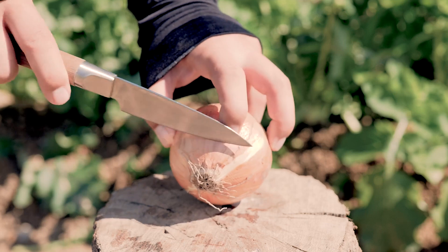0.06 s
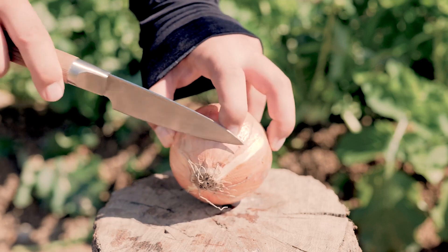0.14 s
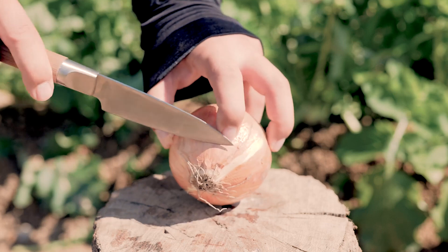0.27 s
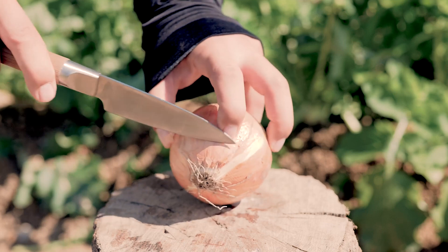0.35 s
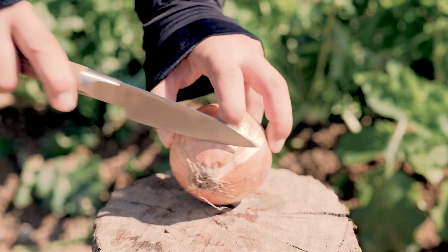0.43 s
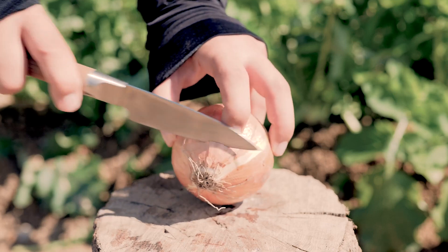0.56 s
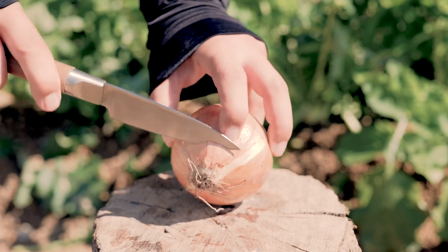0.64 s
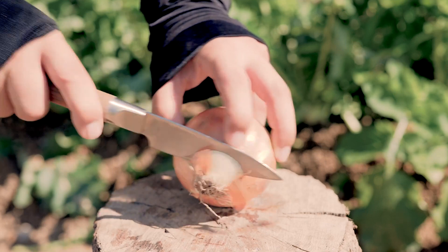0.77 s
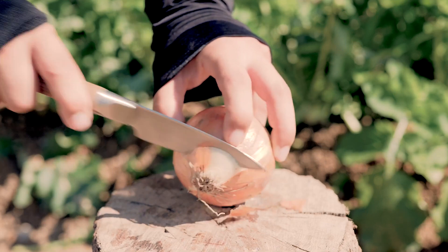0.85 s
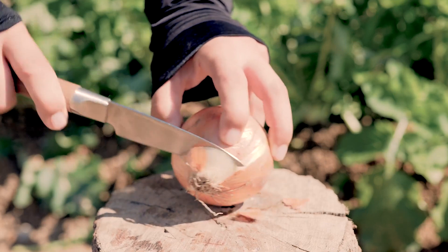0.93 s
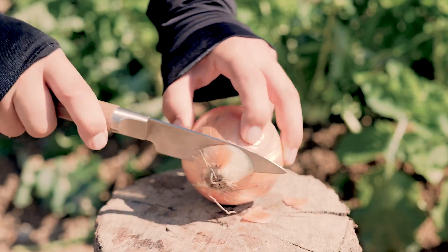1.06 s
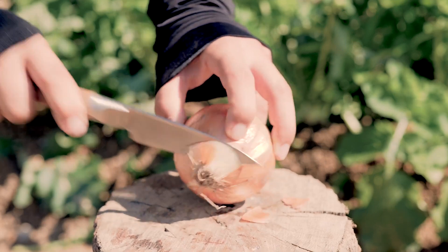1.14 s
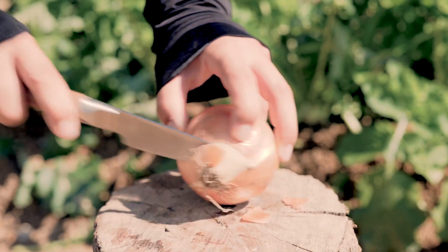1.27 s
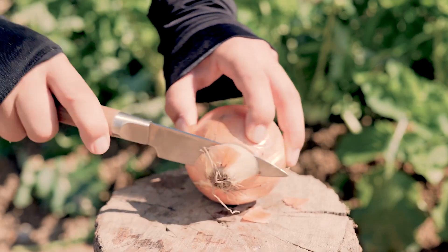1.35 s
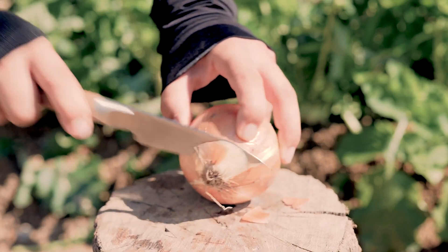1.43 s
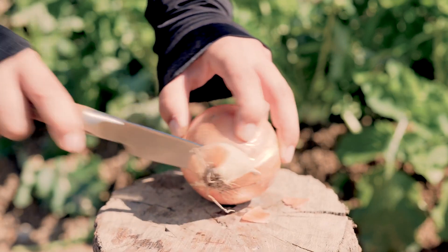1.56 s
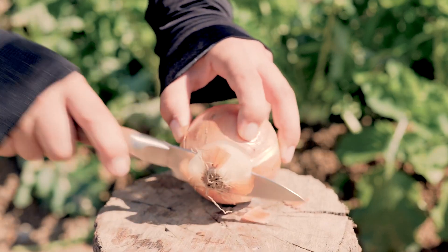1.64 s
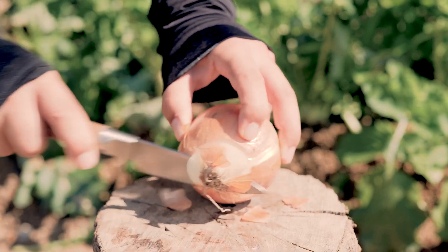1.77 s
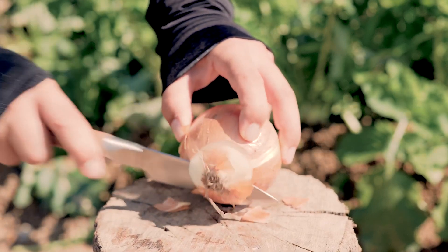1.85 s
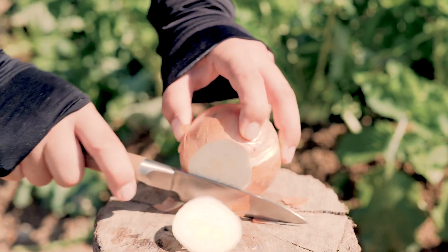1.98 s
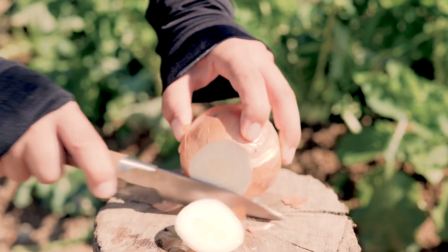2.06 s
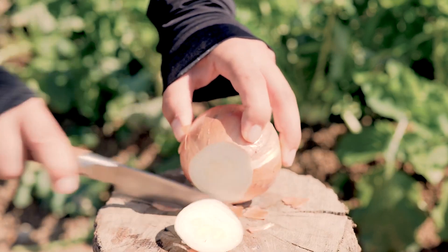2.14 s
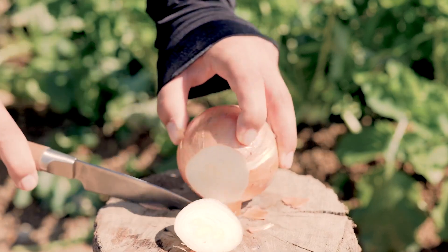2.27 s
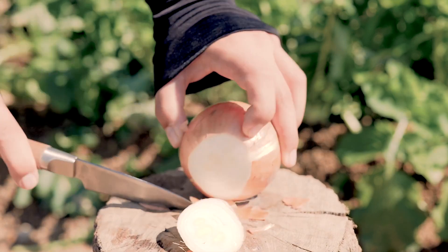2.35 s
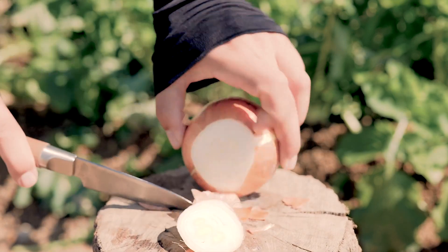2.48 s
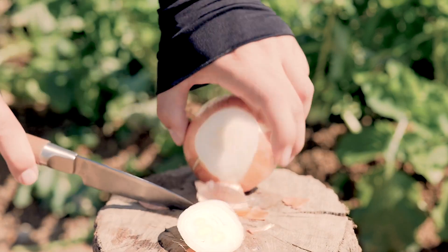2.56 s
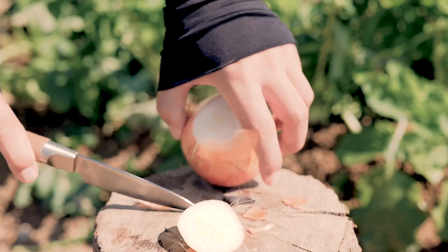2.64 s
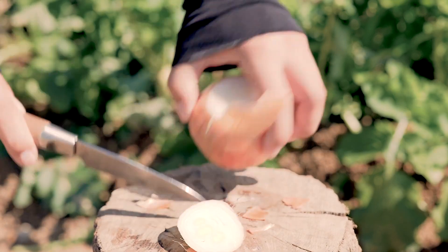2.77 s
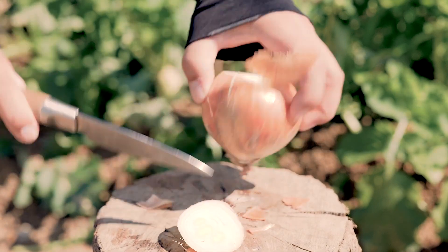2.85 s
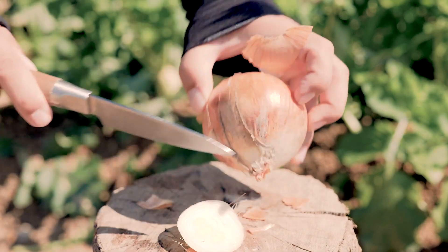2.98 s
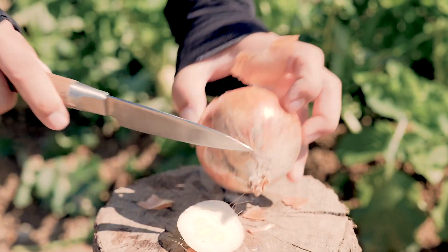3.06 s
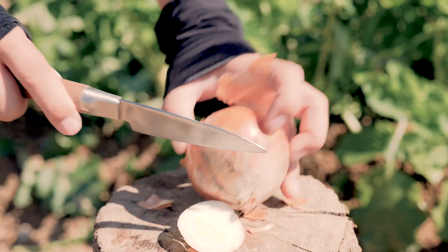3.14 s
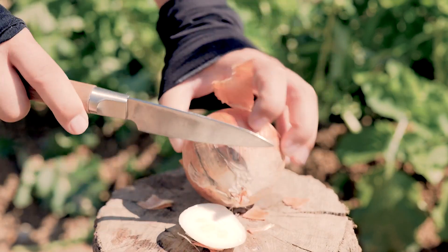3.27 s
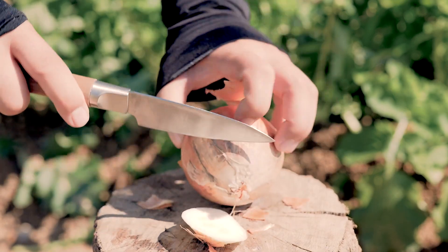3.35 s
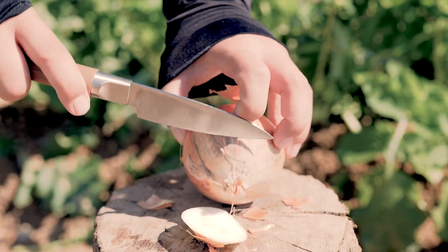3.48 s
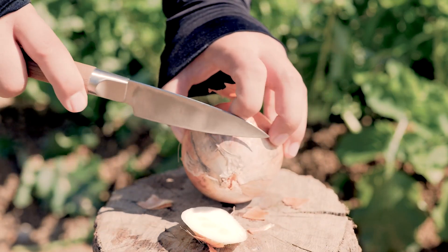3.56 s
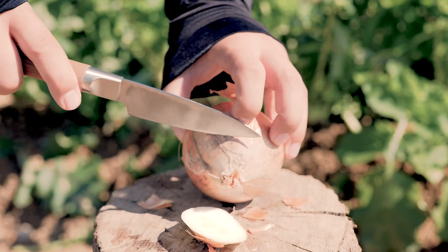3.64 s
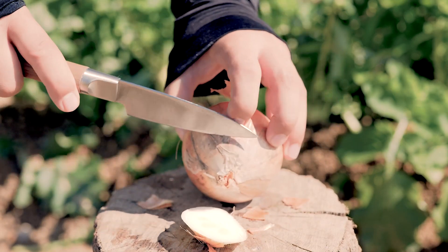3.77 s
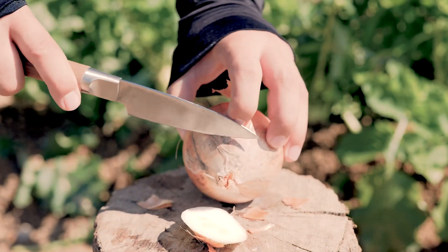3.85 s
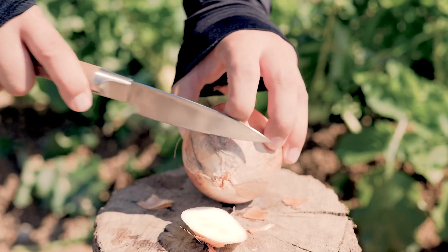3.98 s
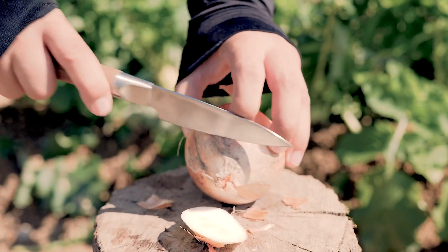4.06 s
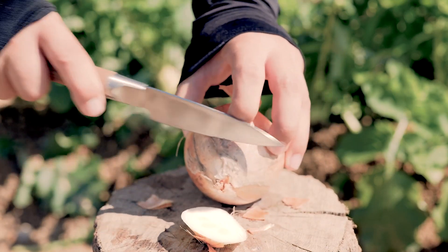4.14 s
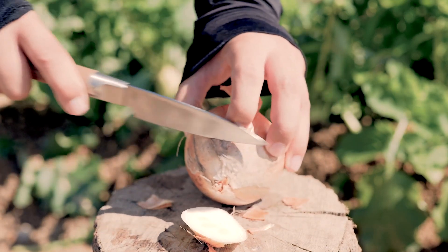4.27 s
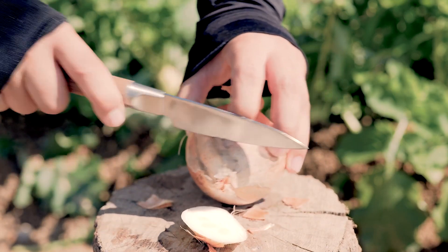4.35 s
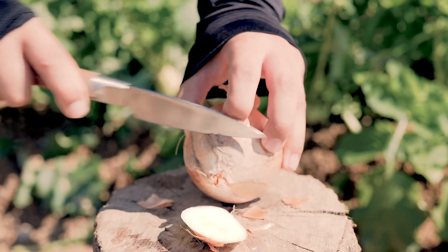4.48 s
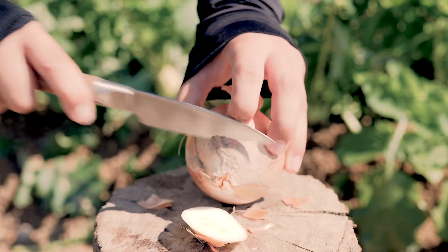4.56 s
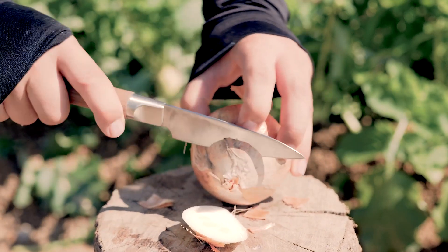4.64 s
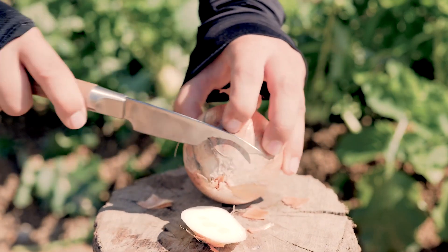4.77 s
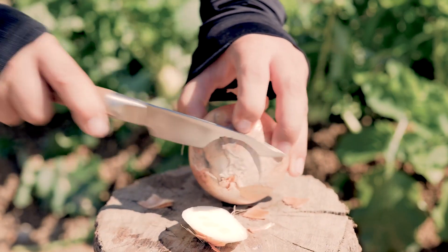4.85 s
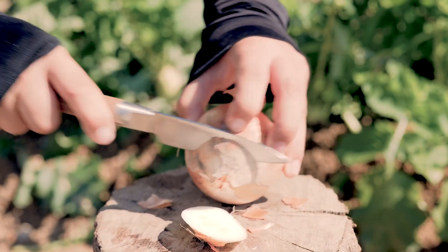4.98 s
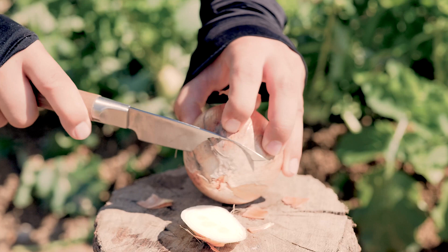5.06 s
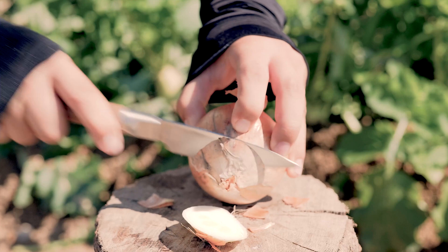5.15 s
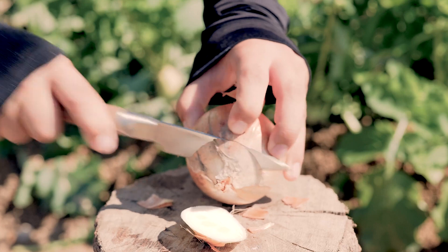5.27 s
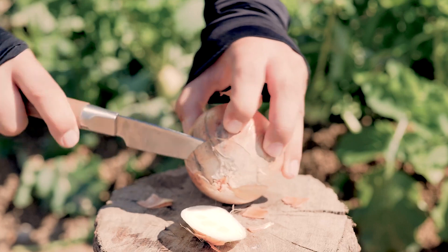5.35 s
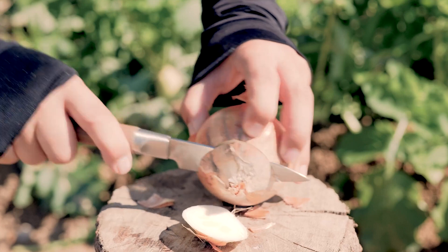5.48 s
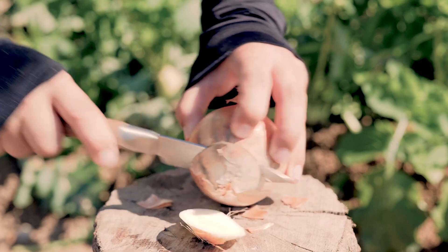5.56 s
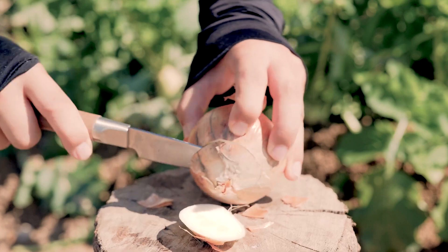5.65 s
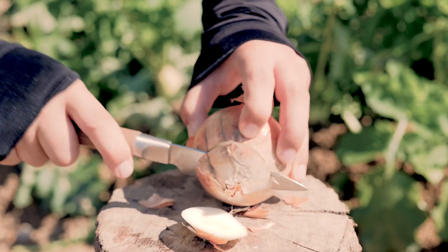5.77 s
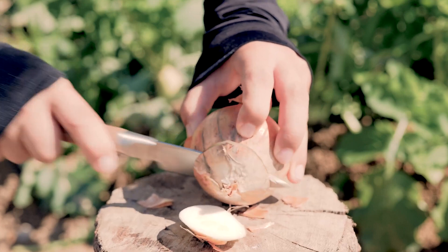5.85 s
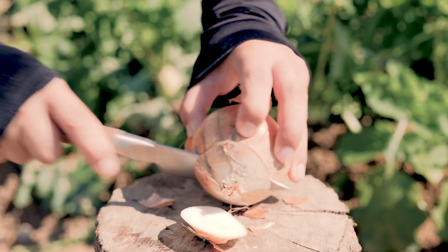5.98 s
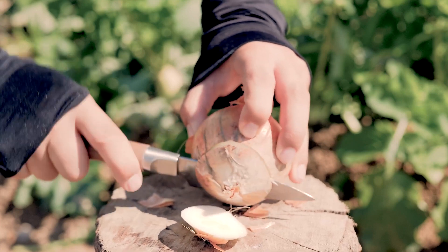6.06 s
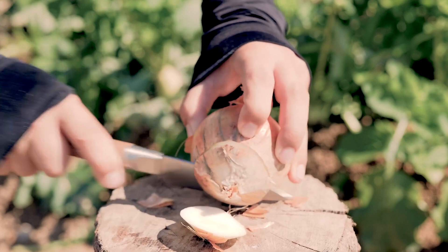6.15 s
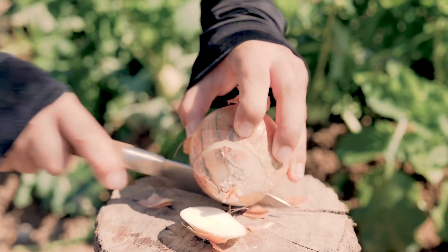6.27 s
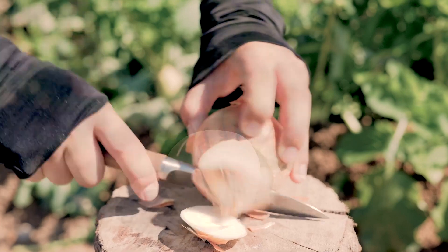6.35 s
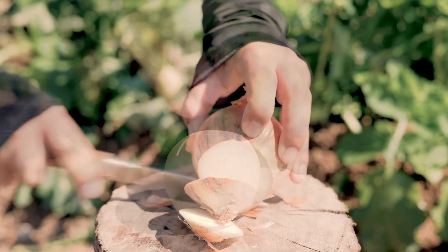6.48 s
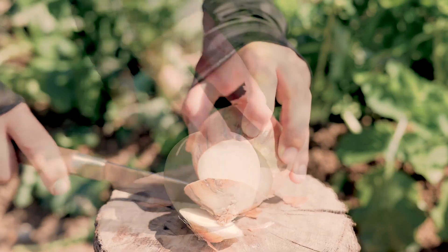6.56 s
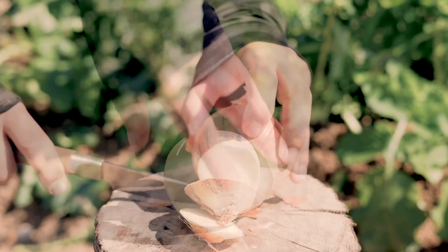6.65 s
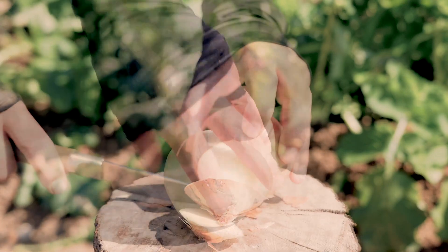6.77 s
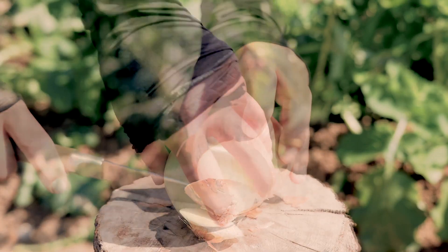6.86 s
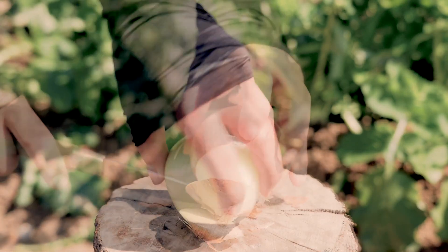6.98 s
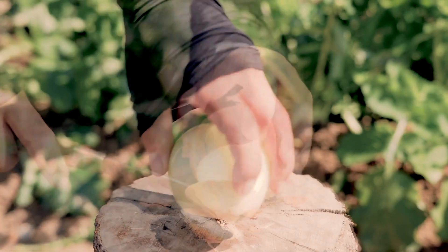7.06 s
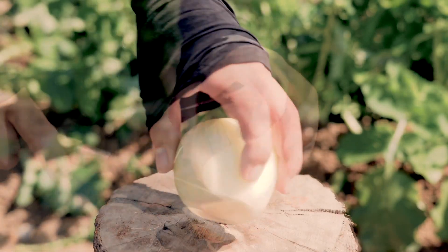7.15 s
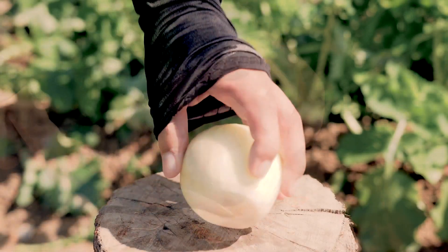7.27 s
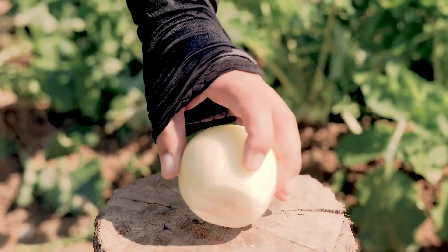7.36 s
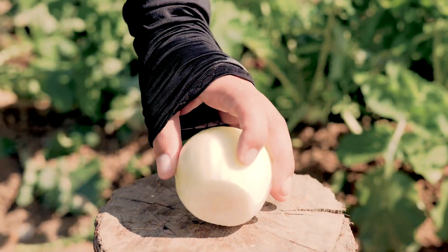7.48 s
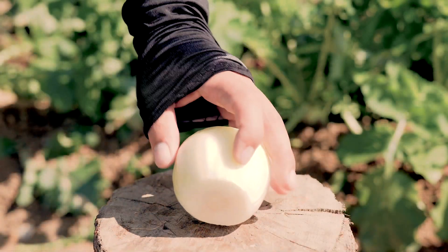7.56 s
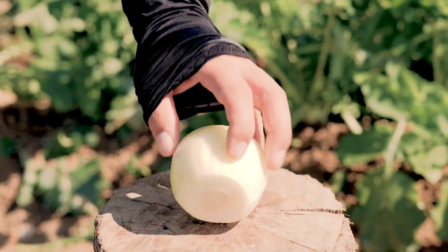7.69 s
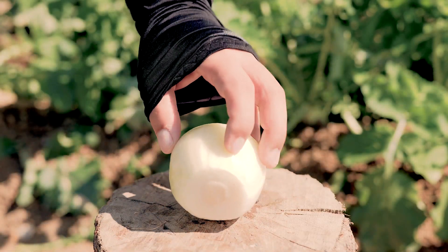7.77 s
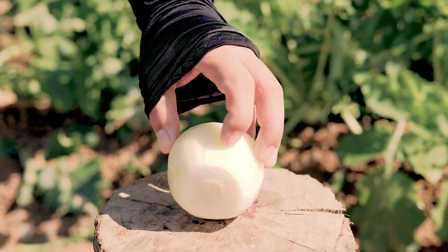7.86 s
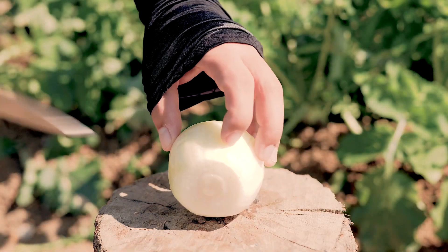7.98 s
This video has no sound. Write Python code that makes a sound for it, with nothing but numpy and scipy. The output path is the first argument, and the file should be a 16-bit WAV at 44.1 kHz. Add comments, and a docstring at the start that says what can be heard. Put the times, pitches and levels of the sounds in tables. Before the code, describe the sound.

A knife crunches through both ends of an onion on a stump, papery skin snapping and tearing, then quiet garden air with small birds.

```python
"""Garden, tree stump: a knife saws both ends off an onion, close to a nearly mono microphone.
Each stroke bursts a swarm of juicy cells and rubs the papery skin: coloured grains and noise under moving levels.
Dry skin and whole layers give way in single snaps: a ringing flake, a noise crack, a knock of the bulb modes.
Dull decaying sines bump the stump. Behind: shaped-noise air and a puff of wind, far engine lines,
gliding sines for small birds, and a late, wavering insect tone."""
import sys
import numpy as np
from scipy import signal
from scipy.fft import rfft, irfft, next_fast_len
from scipy.io import wavfile
from scipy.ndimage import uniform_filter1d

SR = 44100
rng = np.random.default_rng(int(sys.argv[2]) if len(sys.argv) > 2 else 0)


def wav_out(sig):
    """Save sig, one row per channel (or a flat mono array), as 16-bit PCM at SR to the path in sys.argv[1]."""
    wavfile.write(sys.argv[1], SR, np.round(np.clip(np.atleast_2d(sig).T, -1, 1) * 32767).astype(np.int16))


N = 353682

# Knife strokes, to and fro. Each row: peak in seconds, rise in seconds, fall in seconds, scrape in dB,
# bite from 0 (skates on the skin) to 1 (deep in the flesh).
STROKES = [(0.546, 0.055, 0.17, -52, 0.86), (0.611, 0.0024, 0.028, -41.5, 0.98),
           (0.729, 0.045, 0.051, -43, 0.093), (0.83, 0.03, 0.11, -38.5, 0.85),
           (1.027, 0.21, 0.051, -60, 0.83), (1.179, 0.11, 0.05, -47, 1), (1.246, 0.017, 0.11, -57.5, 1),
           (1.452, 0.06, 0.09, -49.5, 1), (1.792, 0.1, 0.037, -37.5, 1), (1.93, 0.1, 0.042, -58, 1),
           (2.04, 0.07, 0.0078, -33, 0.82), (4.204, 0.23, 0.084, -59.5, 0.37),
           (4.311, 0.05, 0.067, -55, .3), (4.478, 0.092, 0.031, -54.5, .1), (4.647, 0.19, 0.015, -52.5, .1),
           (4.725, 0.035, 0.073, -37.5, 0.65), (4.898, 0.089, 0.031, -50, 0.74),
           (5.038, 0.075, 0.037, -43.5, .8), (5.177, 0.14, 0.03, -54, 0.43),
           (5.316, 0.09, 0.032, -45, 0.85), (5.466, 0.15, 0.041, -51, 0.16),
           (5.592, 0.062, 0.074, -37.5, 0.68), (5.719, 0.058, 0.086, -50, 0.67),
           (5.923, 0.11, 0.014, -43, 0.83), (5.978, 0.036, 0.26, -56, 0.94),
           (6.163, 0.067, 0.069, -43.5, 0.87), (6.323, 0.094, 0.05, -48, 1)]
# Skin tearing as a cut end comes away. Each row: peak in seconds, rise in seconds, fall in seconds, scrape in dB.
TEARS = [(2.055, 0.036, 0.023, -29), (2.09, 0.046, 0.37, -43), (2.242, 0.044, 0.049, -38.5),
         (2.302, 0.049, 0.11, -39), (2.456, 0.004, 0.016, -40.5), (6.449, 0.064, 0.046, -29),
         (6.575, 0.11, 0.019, -41.5), (6.622, 0.096, 0.1, -42)]
# Fingers rubbing and turning the bulb. Each row: peak in seconds, rise in seconds, fall in seconds, scrape in dB.
RUBS = [(0.18, 0.05, 0.14, -68), (2.576, 0.21, 0.22, -60), (2.816, 0.04, 0.018, -50),
        (2.976, 0.041, 0.14, -60), (3.317, 0.02, 0.006, -46), (3.452, 0.13, 0.055, -57),
        (4.13, 0.005, 0.01, -49.5), (6.707, 0.061, 0.048, -49)]
# Drop in dB one rise or fall time from the peak: gentle slowing, growing in step with the distance, then the
# short stop (4th power).
SLOW_DB, STOP_DB = 8.5, 14

# Sound of each contact. Each holds: flesh, juice, papery hiss, all in dB re its scrape.
SKATE_TONE_DB = (-14.5, -3.5, 2)
BITE_TONE_DB = (-3.5, 0, -0.5)
TEAR_TONE_DB = (-12.5, -2.5, -5.5)
RUB_TONE_DB = (-6.5, 0.5, -2)
# Crunch colours. Each row: frequency in Hz, relative density in dB per Hz.
FLESH_COLOUR = [(150, -24), (350, -9), (700, -5.5), (1000, -1), (1350, 3), (1900, 2.5), (2300, -0.5),
                (3000, -24)]
JUICE_COLOUR = [(1500, -46), (2300, -6), (2800, 0.5), (3700, -3), (5400, 0), (6500, 0), (8000, -25.5)]
BLADE_COLOUR = [(5500, -24.5), (6800, -4), (7900, -0.5), (8900, 1), (9700, -6), (10500, -11.5),
                (12000, -30)]
PAPER_COLOUR = [(9000, -37), (10400, -3), (11400, -0.5), (12700, 4), (14000, 3), (15300, 0), (16600, -66)]

# Dry skin snapping. Each row: start in seconds, level in dB, flake pitch in Hz.
SNAPS = [(0.5438, -39, 8550), (0.6324, -35, 8350), (0.6868, -34, 8850), (0.9369, -37.5, 12600),
         (1.2444, -37, 13300), (1.7154, -35, 8250), (1.8445, -26.5, 8500), (1.9823, -26.5, 8600),
         (2.0296, -25, 7850), (2.042, -23, 8100), (2.2406, -23.5, 3980), (2.3242, -19.5, 7700),
         (2.4555, -34.5, 8000), (2.7182, -35.5, 5430), (2.8017, -41, 5520), (3.071, -36.5, 7900),
         (3.245, -41.5, 12500), (3.2928, -40, 12500), (4.6432, -24.5, 7000), (5.796, -32, 8140),
         (6.2714, -27.5, 8200), (6.3416, -35, 8400), (6.391, -30, 8200), (6.4077, -28.5, 5800),
         (6.4141, -22, 7870), (6.4391, -23, 6400), (6.4987, -21, 8700), (6.5048, -16.5, 7500),
         (6.5789, -28.5, 4500), (6.6297, -25.5, 9000), (6.6381, -18.5, 8400)]
# Whole layers giving way. Each row: start in seconds, level in dB, flake pitch in Hz, bulb knock in dB re level.
POPS = [(0.627, -34, 14000, -11), (0.9597, -39, 3080, -6), (1.2836, -44.5, 4630, -2),
        (1.5401, -39, 14400, -9), (1.7686, -25, 13100, 0), (1.7759, -24.5, 2720, -16),
        (1.7861, -33, 13500, 4), (1.8034, -28, 7400, -3.5), (1.8458, -34, 8460, -5), (2.093, -31, 3300, -6),
        (2.297, -16.5, 8620, -8), (3.3581, -32, 12470, -8.5), (5.2914, -23.5, 13800, -5),
        (5.3214, -19, 13800, -10), (5.4169, -34, 8900, -10), (5.59, -25, 13300, -9),
        (5.8985, -27.5, 12800, -14), (5.902, -26, 2580, -5.5), (5.9262, -25, 3000, -3),
        (5.9712, -17.5, 13300, -5.5), (6.1978, -37.5, 2700, -3)]
SNAP_KNOCK_DB = -29  # re the break: thin dry skin barely knocks the bulb
# Chance small breaks. Each holds: rate per second (crackle() caps it near 75), level in dB re the scrape,
# median pitch in Hz.
TEAR_CRACKLE = (85, 1.9, 5840)
STROKE_CRACKLE = (18, 2.7, 9200)
RUB_CRACKLE = (18, 12.3, 9100)
CRACKLE_SPREAD_DB, CRACKLE_SPREAD_OCTAVES = 2.5, 0.5
# Bulb modes against the blade. Each row: untuned frequency in Hz, relative level in dB, T60 in seconds.
BULB_MODES = [(765, 2, 0.0098), (1110, 5, 0.0043), (1340, 13, 0.0066), (1770, 4, 0.013), (2600, 1, 0.014)]
# Bulb tuning as the cuts go on. Each row: time in seconds, ratio of the mode frequencies.
BULB_TUNING = [(1.8, 1.1), (2.3, 1.37), (5.3, 0.98), (5.6, 1.07), (5.95, 1.02)]

# Bulb bumping on the stump. Each row: start in seconds, level before decay in dB, pitch in Hz.
BUMPS = [(2.062, -37.5, 320), (3.311, -37, 65.6), (3.354, -46, 332), (6.461, -39, 174), (7.631, -45.5, 68)]

# Arched whistles. Each row: start in seconds, length in seconds, top in Hz, sag of both ends in Hz,
# level in dB re the bird trim.
WHISTLES = [(5.2, 0.08, 4740, 1520, -58), (7.496, .04, 4600, 1110, -53), (7.531, .033, 2940, 200, -58),
            (7.574, 0.036, 4710, 1290, -51), (7.607, 0.035, 3090, 100, -51), (7.918, .075, 4090, 305, -52)]
# Raspy cheeps. Each row: start in seconds, top in Hz, level in dB re the bird trim.
CHEEPS = [(3.745, 3980, -57), (3.944, 4130, -57.5), (6.94, 4440, -52.5), (7.205, 4900, -66),
          (7.255, 3820, -61.5), (7.354, 3880, -59.5), (7.68, 3500, -58.5), (7.77, 3740, -55),
          (7.824, 3400, -55.5), (7.874, 3900, -49.5)]
CHEEP_S, CHEEP_ARCH = 0.036, 0.099  # length; sag of both ends as a share of the top pitch
CHEEP_RASP, WHISTLE_RASP = 0.778, 0.48  # 0-1

# Outdoor air and wind puff colours. Each row: frequency in Hz, relative density in dB per Hz.
AIR_COLOUR = [(22, -11.5), (70, -4.5), (130, -4.5), (350, -18.5), (480, -15), (830, -15), (1000, -18.5),
              (1600, -23), (1850, -19), (2100, -25), (3400, -28), (5900, -33.5), (8500, -33.5),
              (14000, -52.5), (16000, -57)]
BREEZE_COLOUR = [(20, -2), (45, 2.5), (100, 3), (200, -22), (600, -59)]
# Far engine lines. Each row: frequency in Hz, level in dB.
DRONE = [(71, -68.5), (104.5, -67.5), (143, -72), (177, -72), (210, -71)]
TOP_HZ = 16100  # band limit


def amp(db):
    """Amplitude ratio of a level in dB."""
    return 10 ** (np.asarray(db) / 20)


def unit(x):
    """x brought to rms 1."""
    return x / np.sqrt(np.mean(x ** 2) + 1e-20)


def wobble(rate_hz, size):
    """A smooth random curve with rate_hz knots a second."""
    knots = int(size * rate_hz / SR) + 4
    fine = signal.resample(rng.standard_normal(knots), 8 * knots)
    return np.interp(np.arange(size) * rate_hz / SR, np.arange(len(fine)) / 8, fine)


def filtered(x, response):
    """x times a response of frequency."""
    m = next_fast_len(N + 8192)
    spectrum = rfft(x, m) * response(np.fft.rfftfreq(m, 1 / SR))
    return irfft(spectrum, m)[..., :N]


def coloured(x, points):
    """x through a minimum-phase filter given as (Hz, dB) points, brought to rms 1."""
    point_hz, point_db = np.transpose(points)
    hz = np.fft.rfftfreq(2 ** 14, 1 / SR)
    gain_db = np.interp(np.log(hz + 1), np.log(point_hz), point_db)
    # folding the cepstrum makes the filter causal
    cepstrum = irfft(np.log(amp(gain_db)))
    cepstrum[1:len(hz) - 1] *= 2
    cepstrum[len(hz):] = 0
    impulse = irfft(np.exp(rfft(cepstrum)))
    return unit(signal.fftconvolve(x, impulse)[:N])


def patchy(x, depth_db, bins=4, frames=7):
    """The colour of x changes from one instant to the next; brought to rms 1."""
    z = signal.stft(x, nperseg=256)[2]
    field = uniform_filter1d(rng.standard_normal(z.shape), bins, 0)
    field = uniform_filter1d(field, frames, 1)
    return unit(signal.istft(z * amp(depth_db * unit(field)), nperseg=256)[1][:N])


def grains(rate_hz, spread_db):
    """Random impulses of uneven size and sign, rms 1."""
    chance, size = rng.random(N), rng.standard_normal(N)
    sign = rng.choice([-1, 1], N)
    return unit((chance < rate_hz / SR) * sign * amp(spread_db * np.minimum(size, 2)))


def add(track, start_s, sound):
    """Mix a sound into the track at start_s."""
    part = track[round(start_s * SR):][:len(sound)]
    part += sound[:len(part)]


def onion():
    """Knife and finger movements drive the crunch and small breaks; the big breaks stand out of it."""
    sawing, bite, tearing, rubbing = movements()
    steady = crunch(sawing, bite, tearing, rubbing) + skin_ticks()
    skin = np.vstack([SNAPS, crackle(tearing, *TEAR_CRACKLE),
                      crackle(sawing, *STROKE_CRACKLE), crackle(rubbing, *RUB_CRACKLE)])
    return steady + snaps(POPS) + snaps([(*row, SNAP_KNOCK_DB) for row in skin])


def movements():
    """Over time: power of the sawing, bite of the blade, power of the tearing and of the rubbing."""
    sawing, biting = np.zeros(N), np.zeros(N)
    for *stroke, bite in STROKES:
        power = swell(*stroke)
        sawing += power
        biting += np.clip(bite, 0, 1) * power
    tearing = sum(swell(*row) for row in TEARS)
    rubbing = sum(swell(*row) for row in RUBS)
    return sawing, biting / (sawing + 1e-20), tearing, rubbing


def swell(peak_s, rise_s, fall_s, db):
    """Scrape power of one movement as it gathers speed, slows and stops."""
    t = np.arange(N) / SR
    # distance from the peak in rise or fall times
    away = np.abs(np.interp(t, [peak_s - 2 * rise_s, peak_s, peak_s + 2 * fall_s], [-2, 0, 2]))
    moving, power = away < 2, np.zeros(N)
    power[moving] = amp(db - SLOW_DB * away[moving] - STOP_DB * away[moving] ** 4) ** 2
    return power


def crunch(sawing, bite, tearing, rubbing, cell_rate_hz=2200, rub=0.68, judder_db=1.7):
    """Bursting cells sound in flesh, juice, blade and skin at once; a deeper bite is fuller, less papery."""
    def tone(flesh_db, juice_db, paper_db):
        return np.array([[flesh_db], [juice_db], [0], [paper_db]])  # blade at 0 dB

    saw_db = (1 - bite) * tone(*SKATE_TONE_DB) + bite * tone(*BITE_TONE_DB)
    power = sawing * amp(saw_db) ** 2
    power = power + tearing * amp(tone(*TEAR_TONE_DB)) ** 2 + rubbing * amp(tone(*RUB_TONE_DB)) ** 2
    # the blade sticks and slips, so the pressure judders
    pressure = unit(amp(judder_db * wobble(220, N)))
    bursts = grains(cell_rate_hz, spread_db=2)
    out = np.zeros(N)
    for level, colour in zip(np.sqrt(power), (FLESH_COLOUR, JUICE_COLOUR, BLADE_COLOUR, PAPER_COLOUR)):
        grit = coloured(pressure * (bursts + rub * rng.standard_normal(N)), colour)
        # each patch of tissue tears at its own pitch
        out += level * patchy(grit, depth_db=2.8)
    return out


def skin_ticks(rate_hz=70, db=-74):
    """Dry skin rustles faintly under the fingers while on the bulb: sparse grains in three colours."""
    held = np.arange(N) / SR < 6.75
    ticks = grains(rate_hz, spread_db=5)
    rustle = coloured(ticks, BLADE_COLOUR) + coloured(ticks, PAPER_COLOUR) + 0.36 * coloured(ticks, JUICE_COLOUR)
    return amp(db) * held * rustle


def crackle(power, rate_hz, db, median_hz, count=600):
    """Chance breaks (s, dB, Hz), their level following the movement that causes them."""
    chance = rng.random((count, 2))
    scatter = np.clip(rng.standard_normal((count, 2)), -2, 2)
    at = (chance[:, 0] * N).astype(int)
    level_db = 10 * np.log10(power[at] + 1e-20) + db + CRACKLE_SPREAD_DB * scatter[:, 0]
    pitch_hz = np.minimum(median_hz * 2 ** (CRACKLE_SPREAD_OCTAVES * scatter[:, 1]), TOP_HZ)
    heard = (chance[:, 1] < rate_hz * N / SR / count) & (level_db > -60)
    return np.column_stack([at / SR, level_db, pitch_hz])[heard]


def snaps(breaks, flake_t60_s=0.0019, crack_t60_s=0.0015, crack=0.73, tail_t60_s=0.028, tail=0.12):
    """A break flicks a flake of skin for a few cycles, cracks, and knocks the bulb."""
    out, t = np.zeros(N), np.arange(SR // 25) / SR

    def sized(x):
        return x / np.sqrt(np.sum(x ** 2) / (0.002 * SR))  # energy of rms 1 over 2 ms

    # flakes are too small to radiate lows, and the bulb radiates no bass
    treble = signal.butter(2, [1900, 15000], "band", fs=SR)
    no_bass = signal.butter(2, [500, 15000], "band", fs=SR)
    for start_s, db, flake_hz, knock_db in breaks:
        flake = sized(np.sin(2 * np.pi * flake_hz * t) * amp(-60 * t / flake_t60_s))
        # the crack is followed by a short trail of splintering
        decay = amp(-60 * t / crack_t60_s) + tail * amp(-60 * t / tail_t60_s)
        splinters = sized(rng.standard_normal(len(t)) * decay)
        edge = sized(signal.lfilter(*treble, flake + crack * splinters))
        tuning = np.interp(start_s, *np.transpose(BULB_TUNING))
        bulb = np.zeros(len(t))
        for mode_hz, mode_db, t60_s in BULB_MODES:
            envelope = amp(mode_db + rng.normal(0, 1.3) - 60 * t / t60_s)
            bulb += envelope * np.cos(2 * np.pi * mode_hz * tuning * rng.normal(1, 0.027) * t)
        knock = sized(signal.lfilter(*no_bass, bulb))
        add(out, start_s, amp(db) * edge + amp(db + knock_db) * knock)
    return out


def bumps(cycles=9):
    """Soft, dull thuds into the stump: sines that fall 30 dB in the given number of cycles."""
    out, t = np.zeros(N), np.arange(SR // 4) / SR
    for start_s, db, hz in BUMPS:
        envelope = amp(db - 30 * hz * t / cycles) * (1 - np.exp(-hz * t))
        add(out, start_s, envelope * np.sin(2 * np.pi * hz * t))
    return out


def birds(rasp_hz=750, echo_db=-4, echo_t60_s=0.27, trim_db=-1.5):
    """Arched whistles and raspy cheeps: gliding sines, scattered by the foliage as decaying noise."""
    out = np.zeros(N)
    notes = [(*row, WHISTLE_RASP) for row in WHISTLES]
    notes += [(s, CHEEP_S, top, CHEEP_ARCH * top, db, CHEEP_RASP) for s, top, db in CHEEPS]
    for start_s, length_s, top_hz, sag_hz, db, rasp in notes:
        u = np.linspace(0, 1, int(length_s * SR))
        hz = top_hz - sag_hz * (2 * u - 1) ** 2 + rasp ** 2 * rasp_hz * wobble(1300, len(u))
        note = np.sqrt(4 * u * (1 - u)) * np.sin(2 * np.pi * np.cumsum(hz) / SR)
        add(out, start_s, amp(db + trim_db) * unit(note))
    t = np.arange(SR // 2) / SR
    leaves = rng.standard_normal(len(t)) * amp(-60 * t / echo_t60_s)
    echo = signal.fftconvolve(out, leaves / np.linalg.norm(leaves))[:N]
    return out + amp(echo_db) * echo


def insect(hz=3400, waver_hz=55, db=-69.0):
    """A thin, far trill fades in late: a sine of fast-wavering pitch and uneven level."""
    t = np.arange(N) / SR
    trill = np.sin(2 * np.pi * np.cumsum(hz + waver_hz * wobble(300, N)) / SR)
    return amp(db + 1.7 * wobble(25, N)) * np.interp(t, [6.6, 7], [0, 1]) * trill


def air(db=-53, drift_db=0.27):
    """Steady outdoor air: shaped noise whose level and colour drift slightly."""
    noise = coloured(rng.standard_normal(N), AIR_COLOUR)
    return amp(db + drift_db * wobble(2.67, N)) * patchy(noise, depth_db=1.5, bins=2, frames=50)


def gust(db=-53, peak_s=0.24, width_s=0.27):
    """One puff of wind on the microphone: low noise, 20 dB down at width_s from its peak."""
    t = np.arange(N) / SR
    envelope = amp(db - 20 * ((t - peak_s) / width_s) ** 2)
    return envelope * coloured(rng.standard_normal(N), BREEZE_COLOUR)


def engine_drone(waver_rad=1.0):
    """A far engine: low lines that waver in phase and level."""
    t, out = np.arange(N) / SR, np.zeros(N)
    for hz, db in DRONE:
        line = np.sin(2 * np.pi * hz * t + waver_rad * wobble(7, N))
        out += amp(db) * unit(amp(2.3 * wobble(4, N)) * line)
    return out


def scene(width_db=-25):
    """Everything sits in the centre; only a faint flutter of phase differs between the ears."""
    flutter = unit(wobble(110, N))
    mid = onion() + bumps() + birds() + insect() + air() + gust() + engine_drone()
    quadrature = filtered(mid, lambda hz: 1j)  # 90 degree shift
    side = amp(width_db) * quadrature * flutter
    return np.array([mid + side, mid - side])


def record(dry, hiss_db=-68.5):
    """Each channel adds its own faint hiss; a steep low-pass removes all above the band limit."""
    hiss = amp(hiss_db) * rng.standard_normal((2, N))
    return filtered(dry + hiss, lambda hz: 1 / np.sqrt(1 + (hz / TOP_HZ) ** 160))


dry = scene()
out = record(dry)
wav_out(out)
```